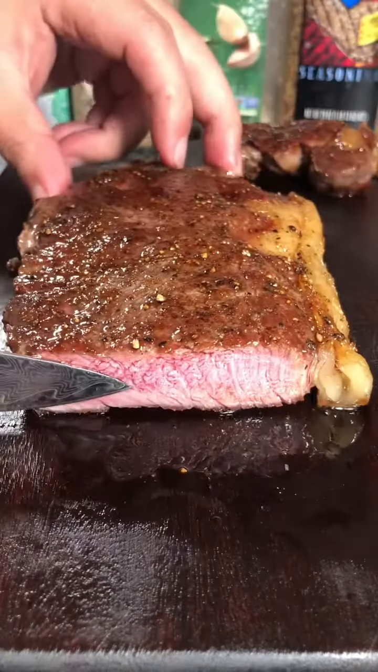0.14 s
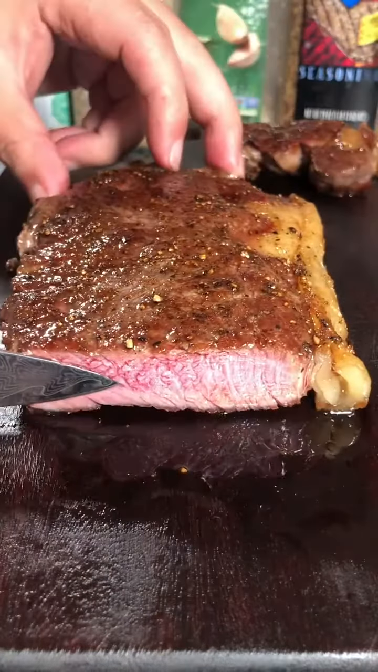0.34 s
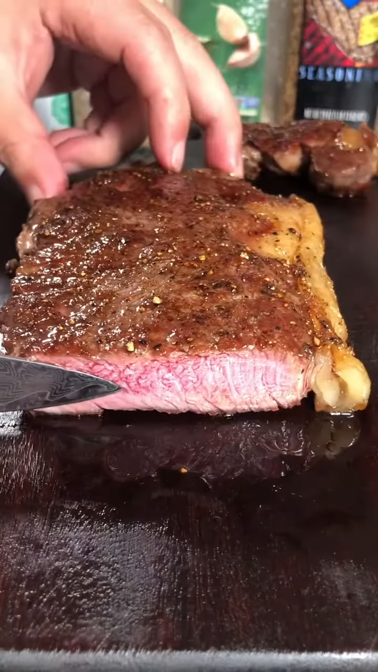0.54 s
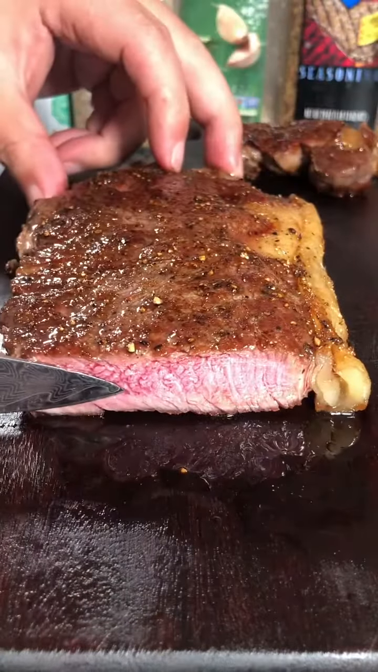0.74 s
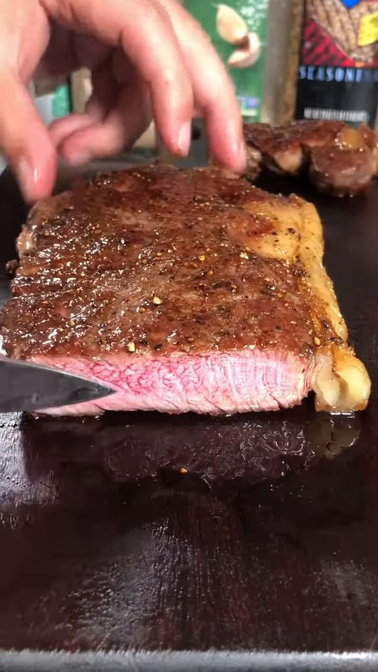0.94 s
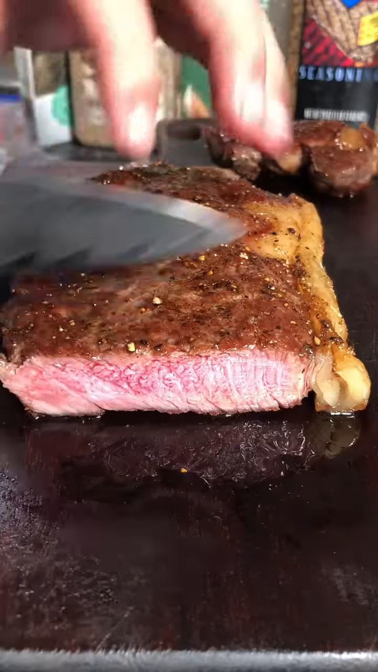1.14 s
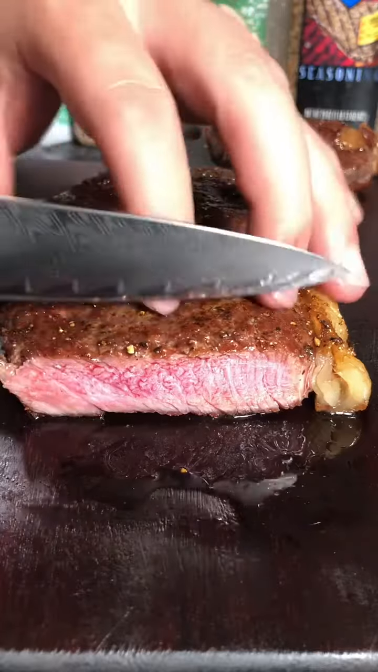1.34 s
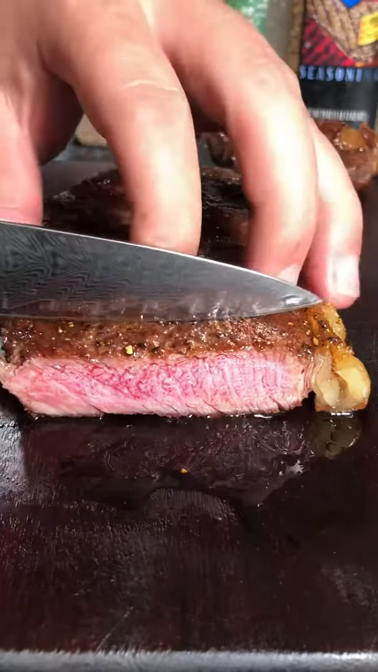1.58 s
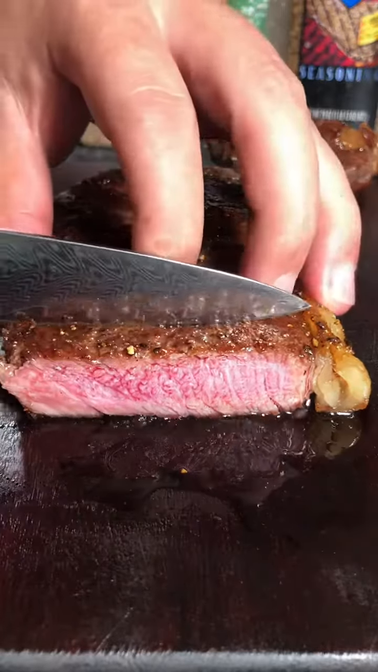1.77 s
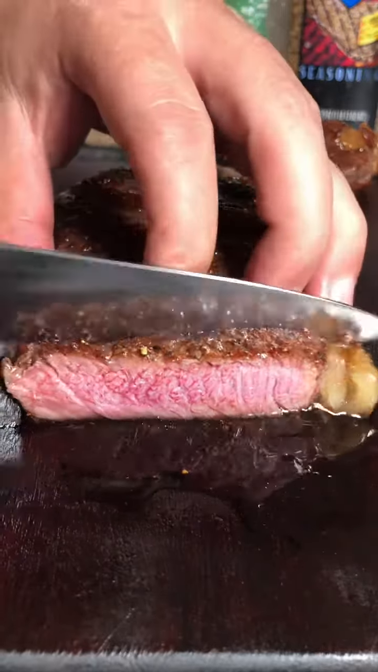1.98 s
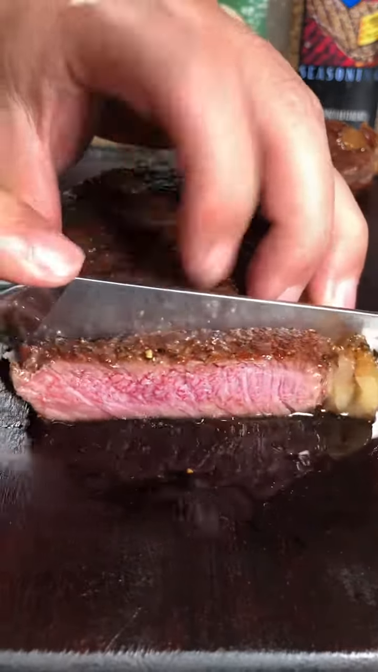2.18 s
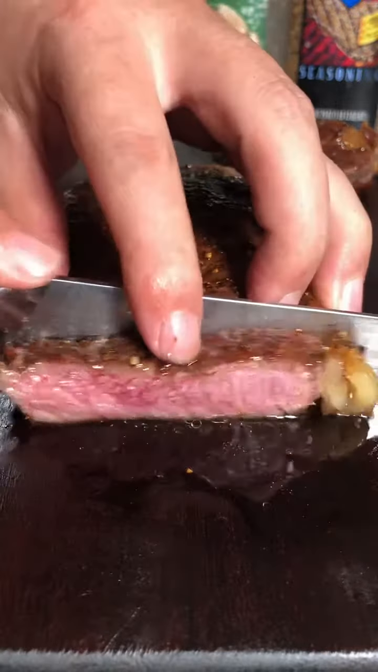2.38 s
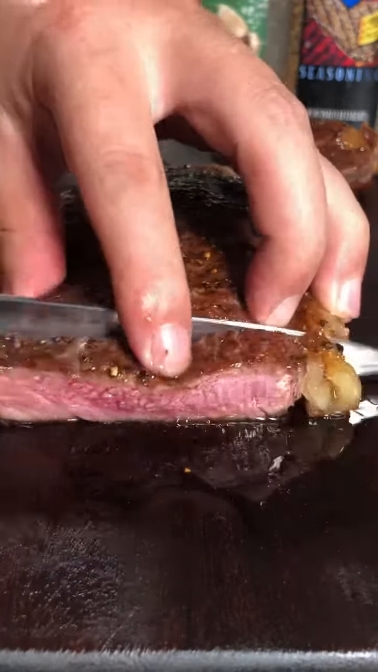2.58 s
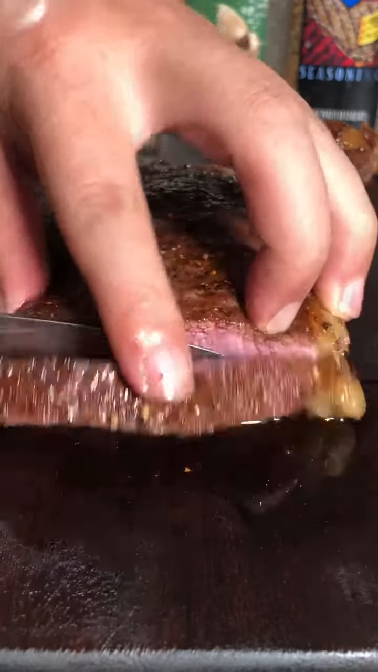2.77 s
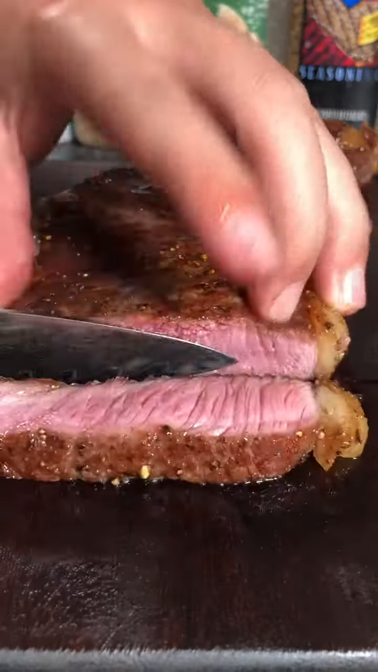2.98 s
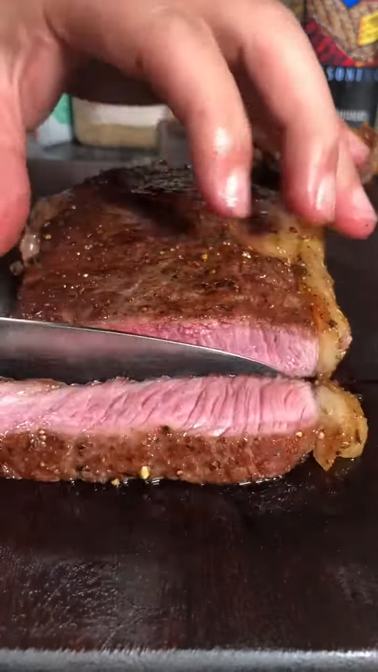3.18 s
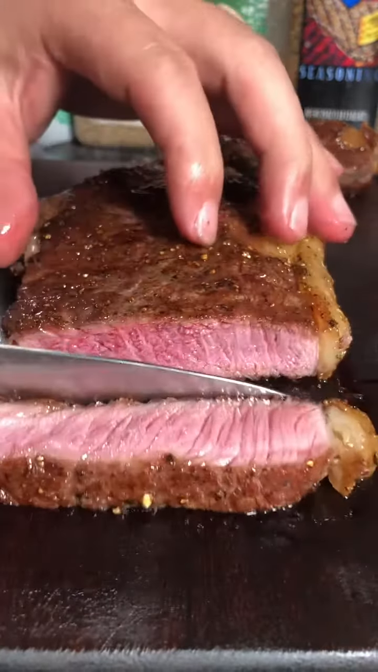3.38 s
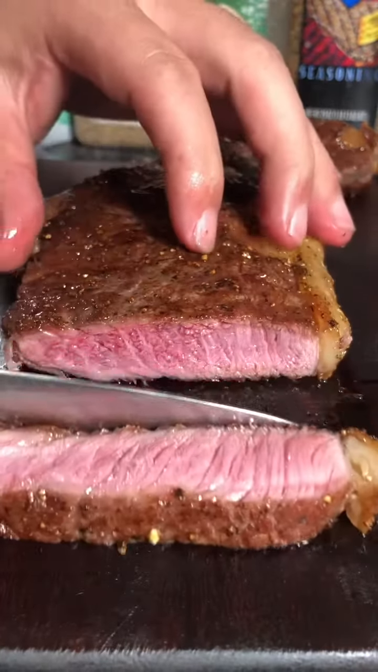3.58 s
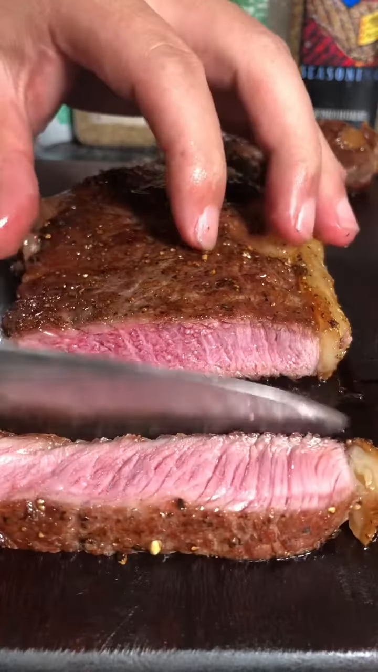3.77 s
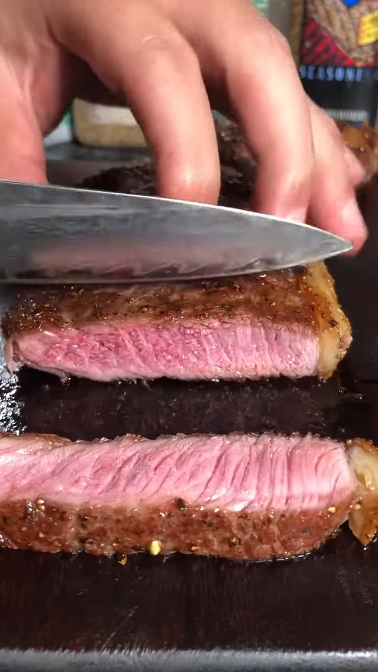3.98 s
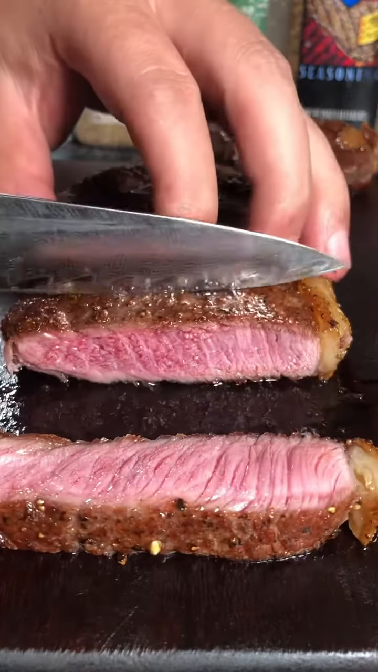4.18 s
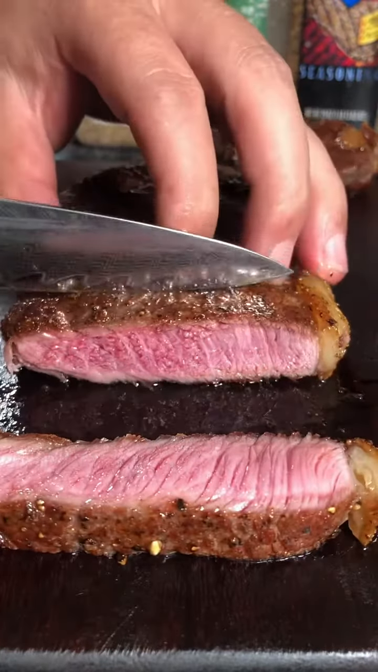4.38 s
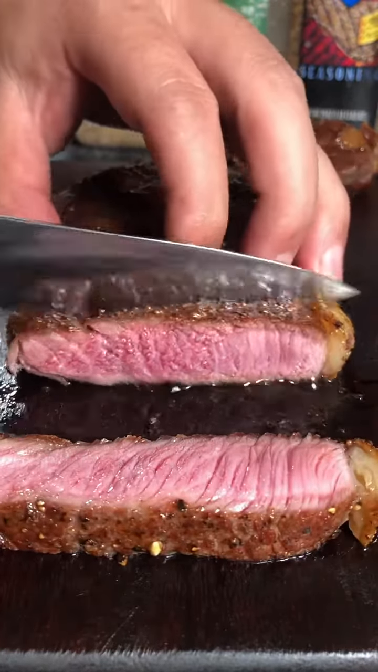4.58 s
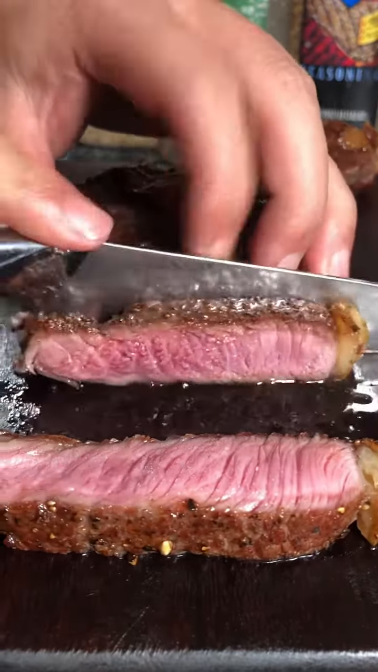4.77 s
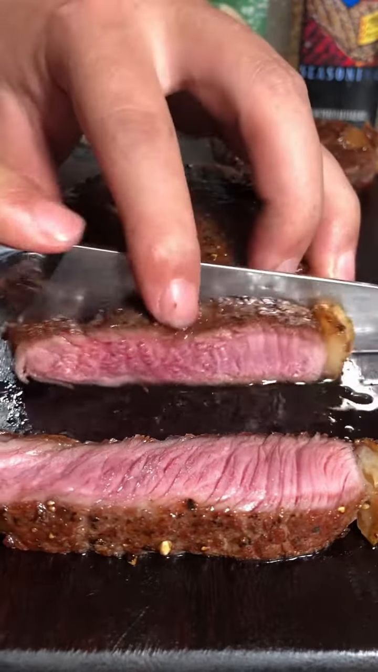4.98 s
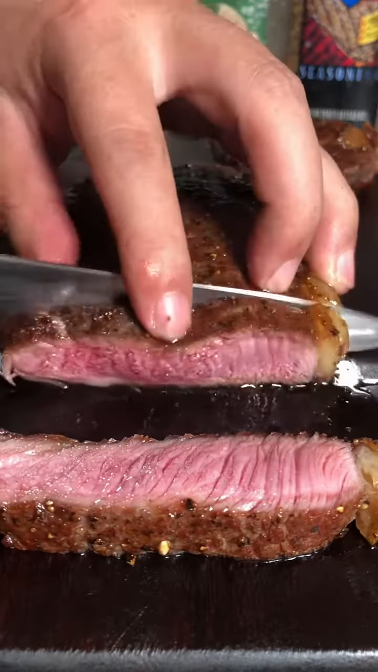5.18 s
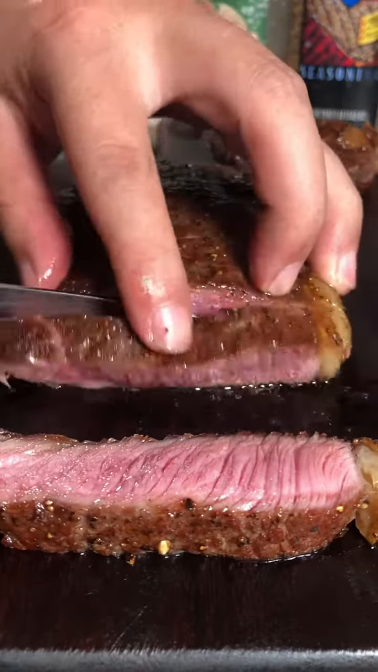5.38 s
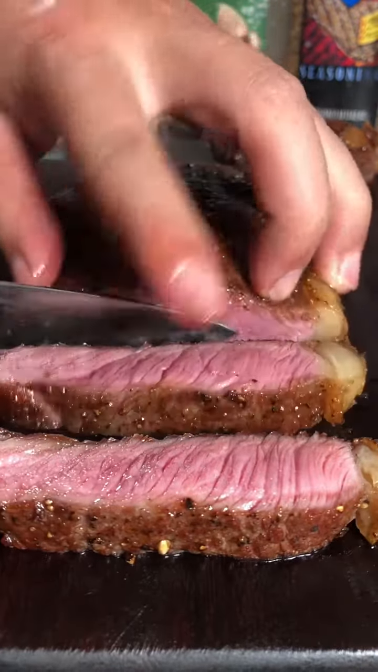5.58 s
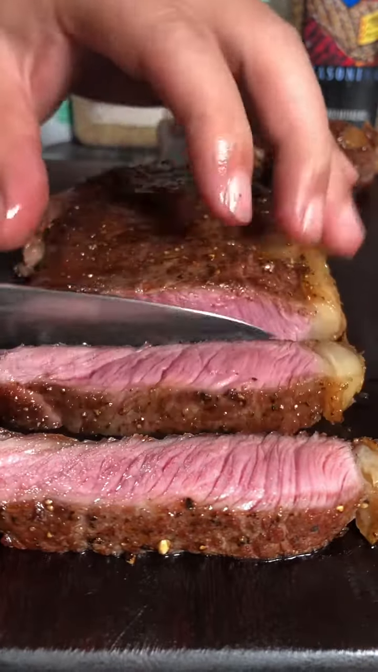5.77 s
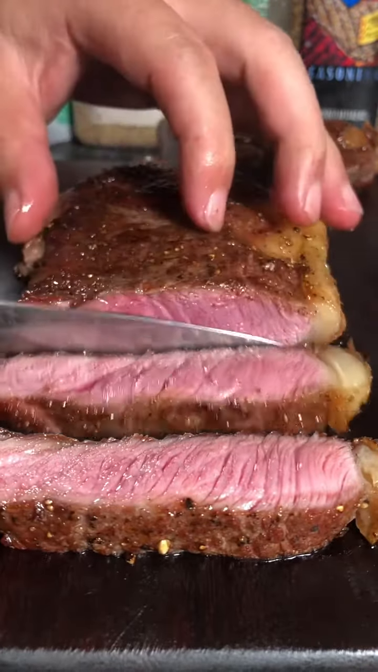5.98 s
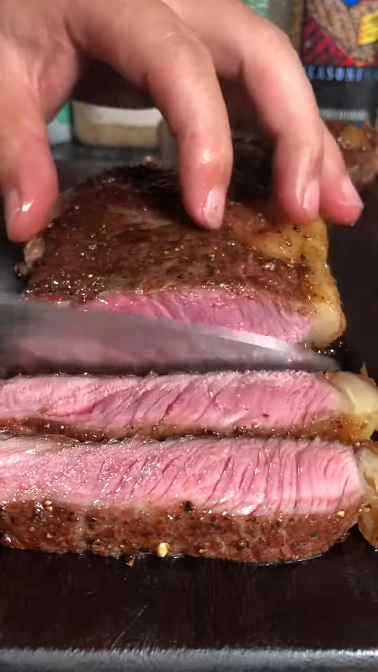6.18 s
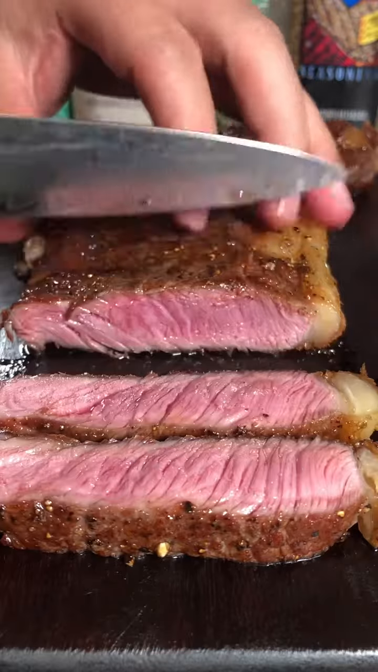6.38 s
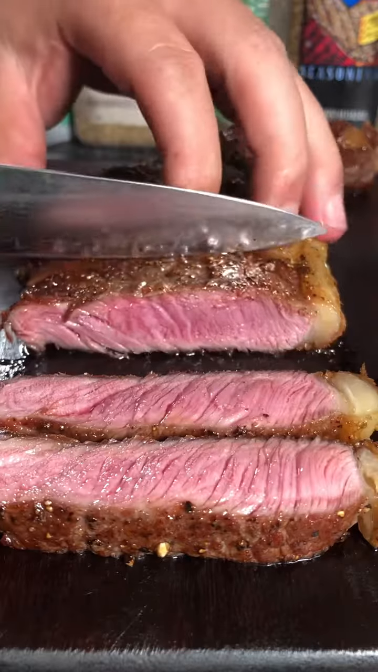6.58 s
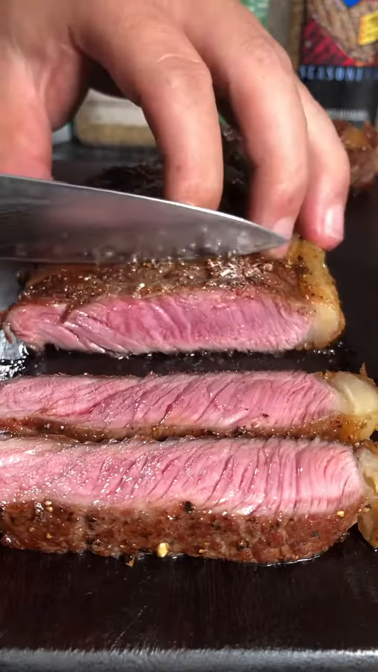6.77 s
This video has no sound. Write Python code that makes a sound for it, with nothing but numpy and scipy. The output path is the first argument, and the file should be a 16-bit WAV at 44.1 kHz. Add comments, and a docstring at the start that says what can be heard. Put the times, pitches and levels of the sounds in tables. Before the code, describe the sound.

Over the steady rumble of a kitchen fan, a knife crackles through crusted, juicy steak and knocks on a wooden cutting board, then drags back with a scrape and sticky wet ticks. After a pause it cuts again, with a sharper clack as the edge snags in the wood. The microphone is close, and the small room adds a short echo.

```python
"""A close knife crackles through a seared steak and knocks on a wooden board, cutting two slices.
Each push breaks the crust in tiny grains, tears fibres and squeezes out juice until the edge hits wood.
Each pull drags the edge over the board, where it scrapes and catches. Wet meat smacks on the steel.
A small kitchen echoes the knife, and a fan rumbles and hums throughout."""
import sys
import numpy as np
from scipy import signal
from scipy.fft import rfft, irfft, next_fast_len
from scipy.io import wavfile
from scipy.ndimage import map_coordinates

SR = 44100
rng = np.random.default_rng(int(sys.argv[2]) if len(sys.argv) > 2 else 0)


def waveform_to_disk(signal):
    """Save audio, clipped to [-1, 1], as 16-bit WAV at the path in sys.argv[1]."""
    frames = np.transpose(np.atleast_2d(signal))
    scaled = np.clip(frames, -1, 1) * 32767
    samples = np.round(scaled).astype(np.int16)
    wavfile.write(sys.argv[1], SR, samples)


N = 301644
TIME = np.arange(N) / SR


# the blade goes down through the meat: start_s, end_s, final_level_db
DOWN_STROKES = [(1.87, 2.068, -44.5), (4.482, 4.72, -43.5)]
def push():
    """The force grows as the cut deepens, then drops away once the edge is through."""
    force = np.zeros(N)
    for start, end, db in DOWN_STROKES:
        depth = np.clip((TIME - start) / (end - start), 0, 1)
        release = fade(np.maximum(TIME - end, 0), t60=0.066)
        force += amp(db) * depth ** 0.93 * release
    return crust(force) + fibres(amp(-5) * force) + juice(force) + clicks()


# the notes of the blade held in the meat: pitch_hz, width_hz, level_db
BLADE_NOTES = [(1005, 96, 5.5), (1610, 100, 9.5), (1822, 82, 11.5), (2210, 140, 5), (2720, 190, 3.5),
               (3000, 210, 1.5), (3900, 570, -9.5), (5230, 540, -5.5), (6300, 600, -14), (8000, 890, -16)]
# a tough patch of crust gives way: peak_s, rise_s, fall_s, level_db
TOUGH_PATCHES = [(4.651, 0.02, 0.006, -46)]
def crust(force):
    """The crust breaks in tiny grains that make the blade ring."""
    return (force + swells(TOUGH_PATCHES)) * unit(resonate(slips(rate=1600), BLADE_NOTES))


# the tone of tearing meat: pitch_hz, level_db
TEAR_TONE = [(300, -36), (1500, 4.5), (3500, -0.5), (7000, -7), (8500, -18), (10000, -33), (15500, -26)]
def fibres(strength):
    """Thousands of meat fibres snap and blur into a tearing sound."""
    return strength * unit(coloured(slips(rate=4500), TEAR_TONE))


# the tone of fizzing juice: pitch_hz, level_db
FIZZ_TONE = [(3000, -40), (7000, 2), (10000, -9), (12000, 1), (16000, -9)]
# a pocket of juice squirts out: peak_s, rise_s, fall_s, level_db
JUICE_SPURTS = [(2.005, .008, .015, -55), (2.026, .008, .009, -54.5), (4.65, .012, .015, -61)]
def juice(force):
    """Squeezed juice fizzes out of the cut."""
    return (amp(-22) * force + swells(JUICE_SPURTS)) * unit(coloured(slips(rate=8000), FIZZ_TONE))


# the blade meets a hard bit: start_s, level_db
HARD_BITS = [(4.5014, -38), (4.5552, -31.5), (4.705, -28), (5.756, -34), (5.765, -35.5)]
def clicks():
    """The blade clicks against crust and gristle."""
    return snaps(HARD_BITS, lambda x: resonate(x, BLADE_NOTES), t60=0.036)


# the edge lands on the board: start_s, relative_level_db, dull_above_hz, pitch_ratio
LANDINGS = [(2.0602, -15, 2600, 1), (2.6254, -30, 1300, 0.91), (4.7158, -13.5, 1720, 0.99),
            (5.2207, -22.5, 1510, 0.94), (5.832, -28, 990, 0.86)]
# the notes of the struck board: pitch_hz, relative_level_db, fade_s
BOARD_NOTES = [(269.5, -15.5, 0.11), (424, -21, 0.097), (616, -24, 0.17), (735, -18, 0.016),
               (847, 3.5, 0.013), (910, -11, 0.059), (1030, -28.5, 0.33), (1293, -13, 0.022),
               (1430, -2, 0.013), (2400, -27, 0.035), (2630, -12.5, 0.018), (2850, -16, 0.014)]
# the tone of a wet tick: pitch_hz, level_db
WET_TONE = [(300, -40), (1400, 8), (2200, 3), (4000, -1.5), (7000, -5.5), (11000, -13), (16000, -28)]
def knocks():
    """The edge hits the board with a tick; the board rings and shudders on the counter."""
    t = np.arange(SR // 2) / SR
    rings = np.zeros(N)
    for s, db, dull_hz, ratio in LANDINGS:
        # a softer landing has weaker high notes and a quieter tick
        ring = sum(amp(level) / np.hypot(1, (hz / dull_hz) ** 2)
                   * fade(t, t60) * np.sin(2 * np.pi * hz * ratio * t)
                   for hz, level, t60 in BOARD_NOTES)
        add(rings, s, amp(db + 8) * ring * (1 - fade(t, 0.011)))
    ticks = [(s, db + 20 * np.log10(dull_hz / 2600)) for s, db, dull_hz, _ in LANDINGS]
    tick = snaps(ticks, lambda x: coloured(x, WET_TONE), t60=0.0042)
    hits = [row[:2] for row in LANDINGS]
    shudder = snaps(hits, lambda x: resonate(x, [(280, 310, 3.5), (1090, 850, -1.5)]), t60=0.037)
    return rings + amp(-23) * tick + amp(-6.5) * shudder


# a knock or a toppling slice jolts the board: start_s, relative_level_db, pitch_hz
JOLTS = [(2.06, -37, 89.5), (3.019, -38, 90), (4.718, -32, 81.5), (5.567, -32.5, 95.6)]
def thumps():
    """The board bumps the counter, which gives a short, low boom."""
    t = np.arange(SR // 2) / SR
    out = np.zeros(N)
    for s, db, hz in JOLTS:
        boom = np.sin(2 * np.pi * hz * t) * fade(t, 0.21)
        add(out, s, amp(db + 10.5) * boom * (1 - fade(t, 0.059)))
    return out


# the blade is drawn back through the cut: peak_s, rise_s, fall_s, level_db
BACK_STROKES = [(2.635, 0.17, 0.074, -45.5), (5.228, 0.21, 0.1, -50)]
# the edge leans on the board: peak_s, rise_s, fall_s, level_db
BOARD_SCRAPES = [(2.544, .02, 0.011, -39), (2.63, 0.015, 0.015, -28), (5.205, 0.037, 0.042, -26.5)]
# the notes of board and knife as the edge drags: pitch_hz, width_hz, level_db
DRAG_NOTES = [(267, 43, 2), (410, 126, -4), (536, 70, -8), (852, 105, 8), (1005, 62, 7.5), (1069, 28, 11.5),
              (1196, 33, 7), (1290, 75, 2.5), (1503, 35, 7.5), (1628, 25, 8), (1742, 12.4, 10.5),
              (1834, 24, 7.5), (2145, 120, -17.5), (2520, 67, -34), (2690, 180, -5.5), (3010, 45, -5.5),
              (3140, 91, -8.5), (4000, 350, -19), (5050, 160, -47), (5830, 170, -20), (8240, 190, -23.5)]
def pull():
    """The edge sticks and slips along the wood; the last fibres tear and rub the steel."""
    speed = swells(BACK_STROKES)
    contact = amp(4) * speed + swells(BOARD_SCRAPES)
    wood = contact * unit(resonate(slips(rate=1800), DRAG_NOTES))
    tearing = fibres(speed)
    steel = amp(-3.5) * speed * unit(resonate(slips(rate=4900), BLADE_NOTES))
    return wood + tearing + steel


# the edge snags in the wood and lets go: start_s, level_db
SNAGS = [(2.6301, -22), (5.134, -28.5), (5.2184, -23), (5.221, -10.5), (5.2469, -23)]
def catches():
    """An edge dug into the wood stops it ringing, so each release is a dry, blunt clack."""
    damped_notes = [(hz, 7 * width, db) for hz, width, db in DRAG_NOTES]  # wider notes die sooner
    ring = resonate(signal.unit_impulse(N), damped_notes)
    clack = filtered(ring, lambda hz: 1 / (1 + 1j * hz / 4500) ** 2)[:SR // 10]  # soften the treble
    out = np.zeros(N)
    for s, db in SNAGS:
        add(out, s, amp(db) * clack / np.abs(clack).max())
    return out


# the wet blade squeaks: start_s, level_db
WET_SQUEAKS = [(4.455, -47), (5.2195, -33), (5.785, -44)]
# wet meat peels off the steel: start_s, level_db
PEELS = [(2.4116, -42), (2.553, -40), (2.589, -37), (2.6305, -29), (2.8636, -34.5), (4.9424, -32),
         (4.952, -34), (5.068, -38)]
def smacks():
    """Thin films of juice squeak and snap as the meat lets go of the blade."""
    squeaks = snaps(WET_SQUEAKS, lambda x: resonate(x, [(6240, 220, 0)]), t60=0.025)
    return squeaks + snaps(PEELS, lambda x: coloured(x, WET_TONE), t60=0.02)


# how long the room rings: pitch_hz, fade_s
ROOM_FADES = [(100, 0.9), (400, 0.57), (1000, 0.41), (2500, 0.43), (10000, 0.62)]
def kitchen(x, delay_s):
    """The room's echoes blend into a tail, each pitch dying at its own speed."""
    hz, t, noise = signal.stft(rng.standard_normal(SR // 2), SR, nperseg=256)
    tail = signal.istft(noise * fade(t, along(ROOM_FADES, hz)[:, None]), SR, nperseg=256)[1]
    return echo(x, tail, delay_s)


def far_wall(x, delay_s):
    """A wall sends back one late, scattered echo, mostly of the middle pitches."""
    t = np.arange(SR // 10) / SR
    scatter = rng.standard_normal(len(t)) * fade(t, 0.13)
    return resonate(echo(x, scatter, delay_s), [(1000, 370, 0)])


# the tones of the fan's rumble and of its rushing air: pitch_hz, relative_level_db
RUMBLE_TONE = [(15, -63), (25, -60), (43, -13.5), (70, -11.5), (102, -3.5), (141, 0.5), (167, -9),
               (205, -2.5), (246, -8.5), (374, -15), (401, -10), (467, -17.5), (552, -13), (609, -20),
               (700, -20.5), (910, -51), (1540, -120)]
AIR_TONE = [(350, -9), (600, -12.5), (788, 1.5), (866, 3), (1010, -4), (1090, -5), (1620, -8),
            (2400, -13.5), (7140, -19.5), (12100, -27.5), (15500, -30.5)]
# the hum of the mains and the fan motor: pitch_hz, level_db
HUM_NOTES = [(59.8, -55), (96.9, -48), (193.8, -61)]
def fan():
    """A fan rumbles and blows air while its motor hums a little unsteadily."""
    rumble = amp(-39 + 0.6 * wobble(7)) * unit(coloured(rng.standard_normal(N), RUMBLE_TONE))
    air = amp(-50.5 + 0.078 * wobble(3.6)) * unit(coloured(rng.standard_normal(N), AIR_TONE))
    hum = sum(amp(db + 1.2 * wobble(3.31)) * np.sqrt(2)
              * np.sin(2 * np.pi * hz * TIME + 0.24 * wobble(3.06)) for hz, db in HUM_NOTES)
    return rumble + air + hum


def slips(rate):
    """Tiny random clicks, about rate a second, in louder and softer clumps."""
    size = amp(3.3 * np.clip(rng.standard_normal(N), -2, 2) + 2.2 * wobble(110))
    return (rng.random(N) < rate / SR) * size * rng.choice([-1, 1], N)


def snaps(events, body, t60):
    """A short burst of noise through the body filter for each (start_s, peak_db)."""
    t = np.arange(SR // 10) / SR
    ring = body(signal.unit_impulse(N, SR // 1000))[:len(t)]
    out = np.zeros(N)
    for s, db in events:
        sound = signal.fftconvolve(rng.standard_normal(len(t)) * fade(t, t60), ring)
        add(out, s - 1 / 1000, amp(db) * sound / np.abs(sound).max())
    return out


def swells(rows):
    """A loudness curve that rises to each peak and eases off."""
    gain = np.zeros(N)
    for s, rise, fall, db in rows:
        away = np.abs((TIME - s) / np.where(TIME < s, rise, fall))
        gain += amp(db) * np.exp(-away ** 1.28)  # a power of 1 is pointed, 2 is rounded
    return gain


def amp(db):
    """Turn decibels into a multiplier."""
    return 10 ** (np.asarray(db) / 20)


def unit(x):
    """Scale to an average (rms) level of 1."""
    return x / np.sqrt(np.mean(x ** 2) + 1e-20)


def along(points, hz):
    """Read between (pitch_hz, value) points on a musical scale."""
    pitches, values = np.transpose(points)
    return np.interp(np.log(hz + 1), np.log(pitches + 1), values)


def fade(t, t60):
    """Die away by 60 dB in t60 seconds (fade_s in the tables)."""
    return np.exp(-np.log(1000) * t / t60)


def wobble(rate):
    """A smooth curve through rate random points a second."""
    return map_coordinates(rng.standard_normal(int(N * rate / SR) + 4), [TIME * rate])


def filtered(x, response):
    """Multiply each frequency in x by response(hz)."""
    size = next_fast_len(N + SR // 2)
    return irfft(rfft(x, size) * response(np.fft.rfftfreq(size, 1 / SR)), size)[:N]


def coloured(x, tone):
    """Shape the lows and highs of x with a tone table."""
    return filtered(x, lambda hz: amp(along(tone, hz)))


def resonate(x, notes):
    """Ring x at each (pitch_hz, width_hz, level_db); neighbours swing opposite ways."""
    return filtered(x, lambda f: sum(
        (-1) ** k * amp(db) * 1j * f * width / (hz * hz - f * f + 1j * f * width)
        for k, (hz, width, db) in enumerate(notes)))


def echo(x, tail, delay_s):
    """Smear x with an echo tail that starts after delay_s."""
    late_tail = np.pad(tail / np.linalg.norm(tail), (round(delay_s * SR), 0))
    return signal.fftconvolve(x, late_tail)[:N]


def add(track, start_s, sound):
    """Mix a sound into the track at start_s."""
    part = track[round(start_s * SR):][:len(sound)]
    part += sound[:len(part)]


def scene():
    """The knife in its room, over the fan; the knocks also bounce off a far wall."""
    blows = knocks()
    knife = blows + thumps() + push() + pull() + catches() + smacks()
    room = amp(-8) * kitchen(knife, delay_s=0.006)
    wall = amp(-11) * far_wall(blows, delay_s=0.038)
    return (knife + room + wall + fan())[None]


def record(dry):
    """The microphone keeps nothing above its highest pitch."""
    top_hz = 15750
    return np.array([filtered(channel, lambda hz: hz < top_hz) for channel in dry])


dry = scene()
out = record(dry)
waveform_to_disk(out)
```